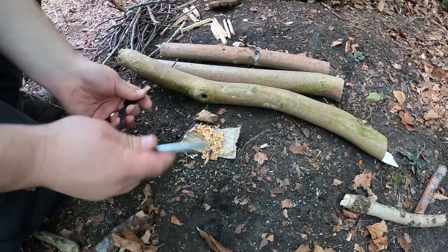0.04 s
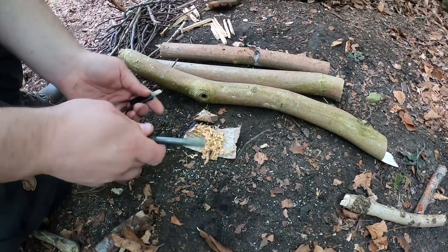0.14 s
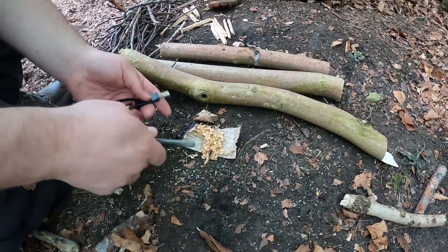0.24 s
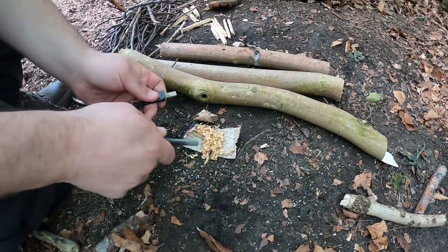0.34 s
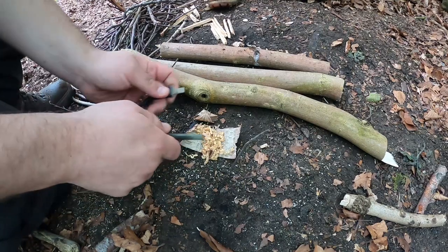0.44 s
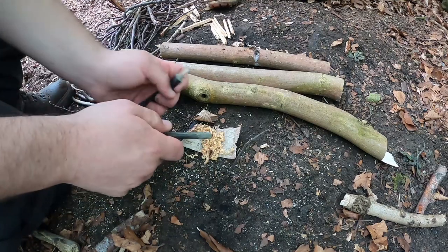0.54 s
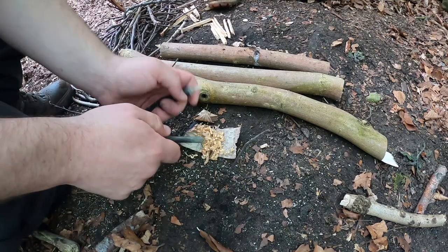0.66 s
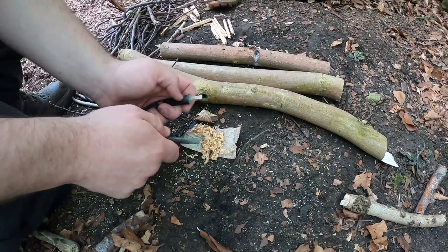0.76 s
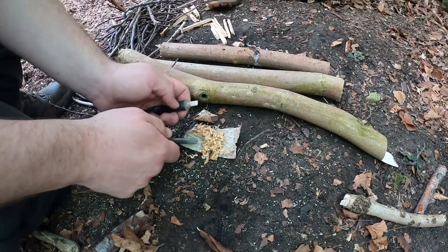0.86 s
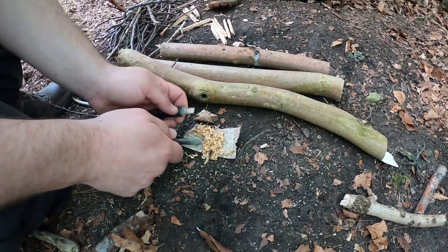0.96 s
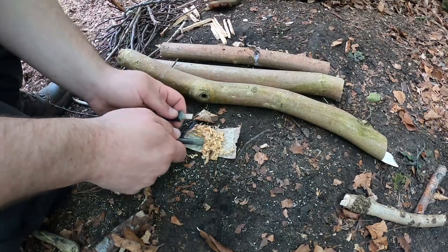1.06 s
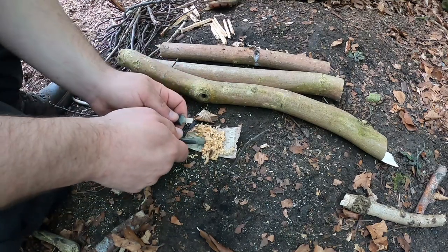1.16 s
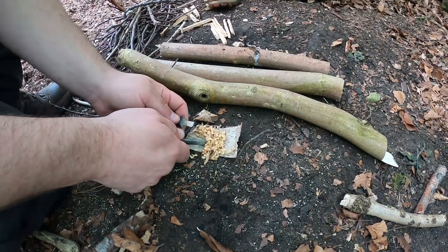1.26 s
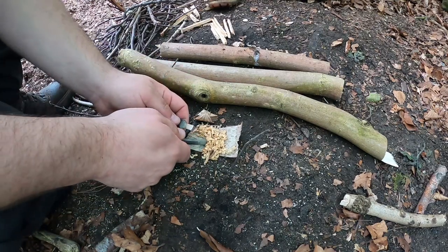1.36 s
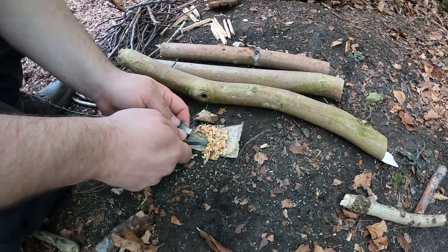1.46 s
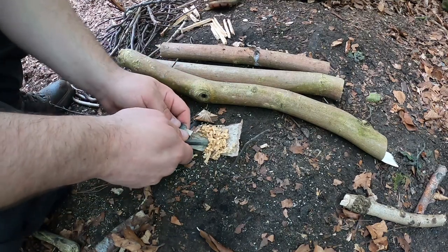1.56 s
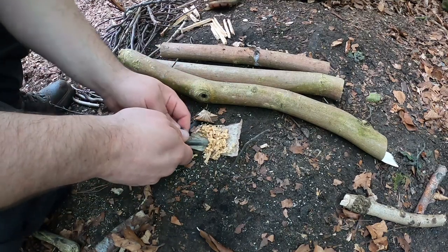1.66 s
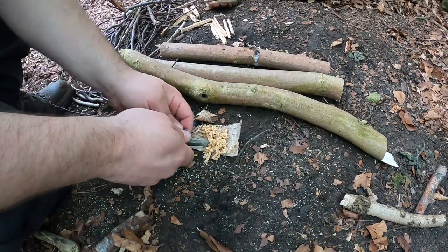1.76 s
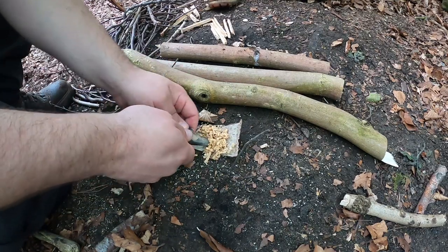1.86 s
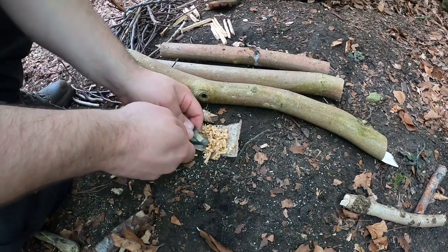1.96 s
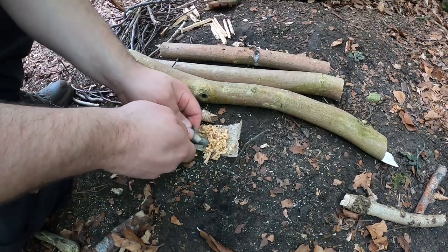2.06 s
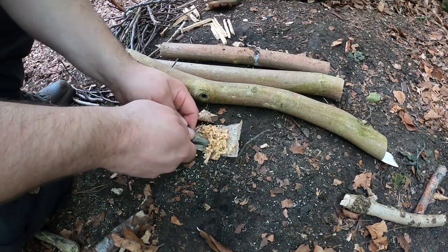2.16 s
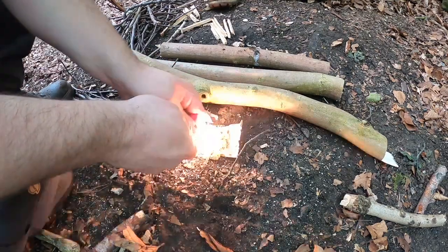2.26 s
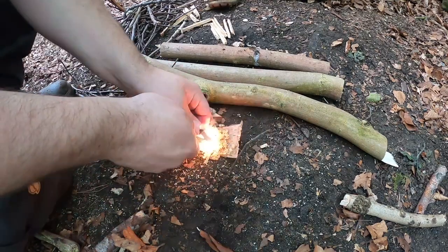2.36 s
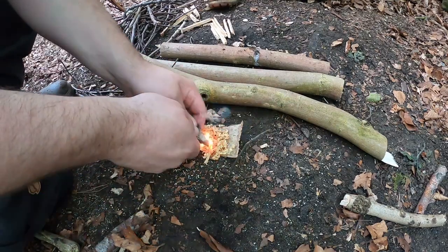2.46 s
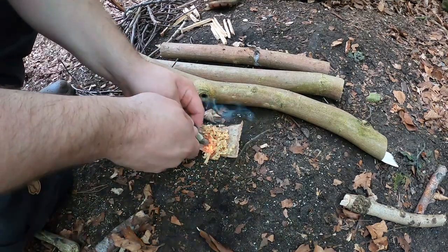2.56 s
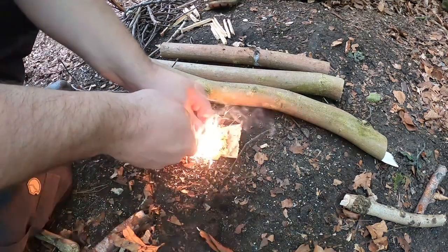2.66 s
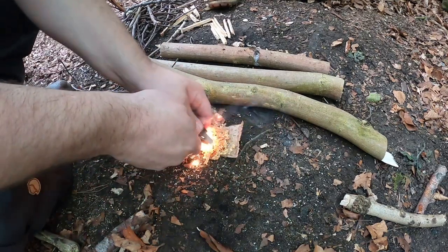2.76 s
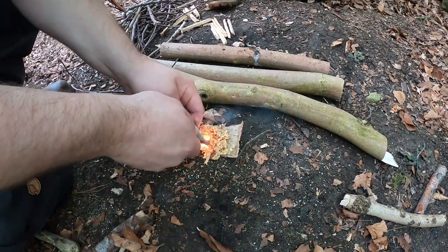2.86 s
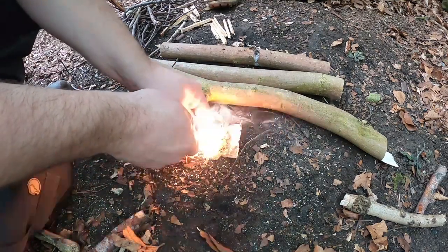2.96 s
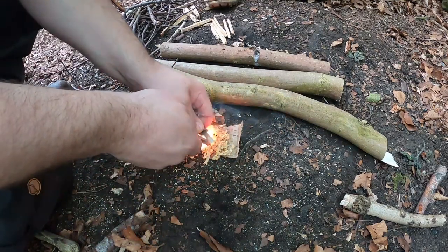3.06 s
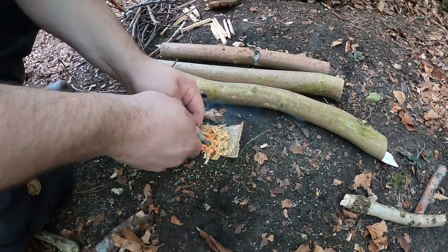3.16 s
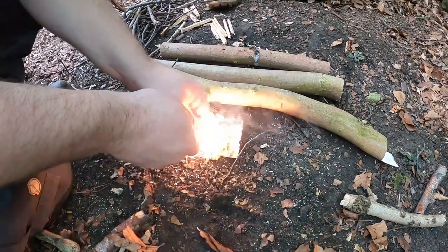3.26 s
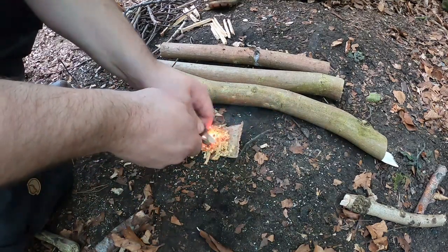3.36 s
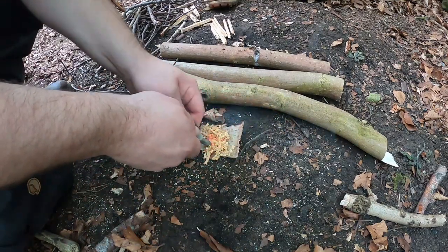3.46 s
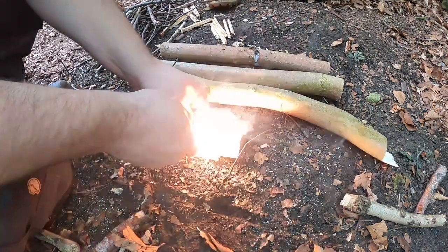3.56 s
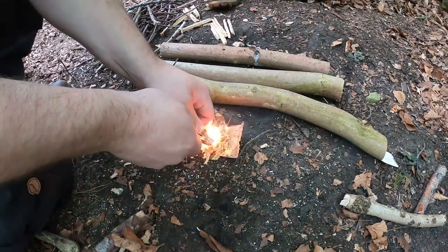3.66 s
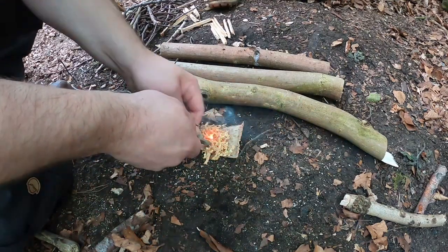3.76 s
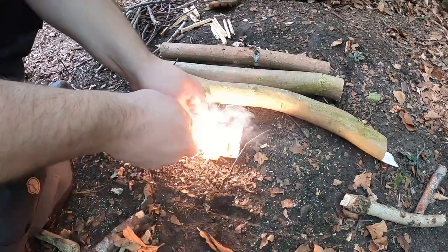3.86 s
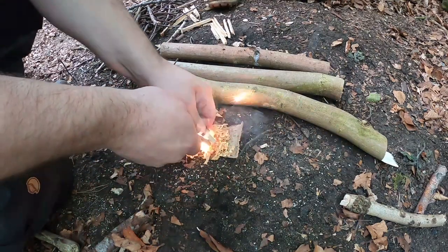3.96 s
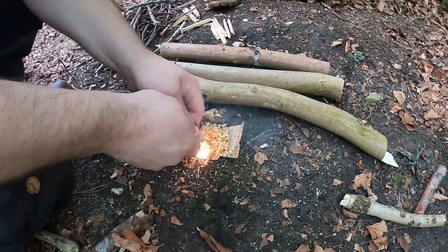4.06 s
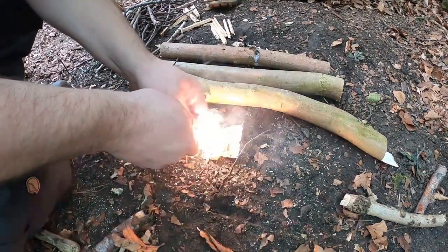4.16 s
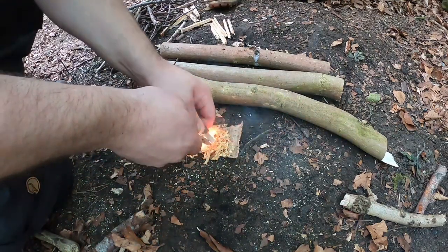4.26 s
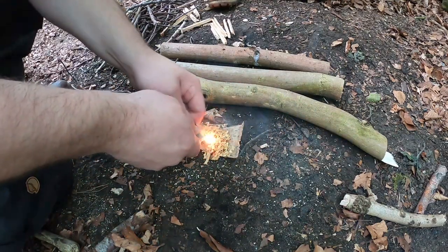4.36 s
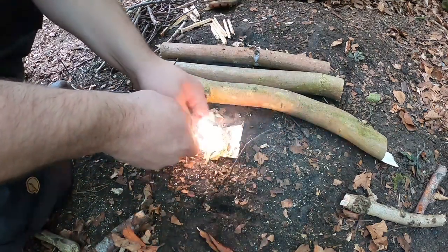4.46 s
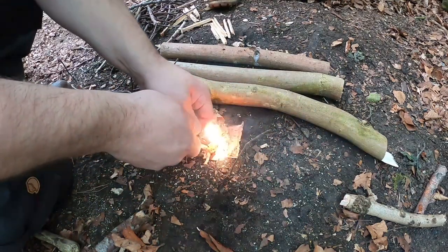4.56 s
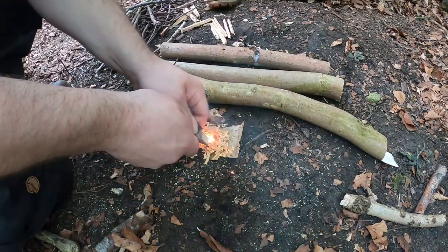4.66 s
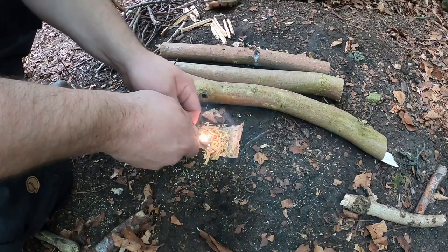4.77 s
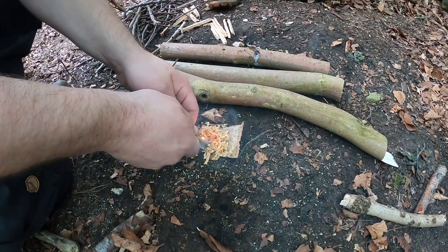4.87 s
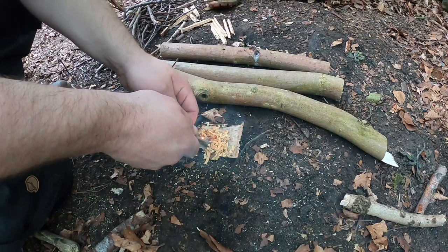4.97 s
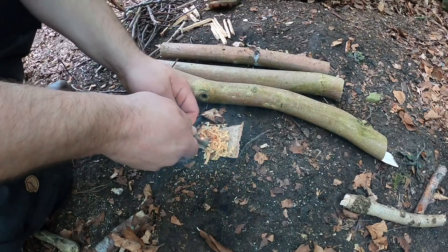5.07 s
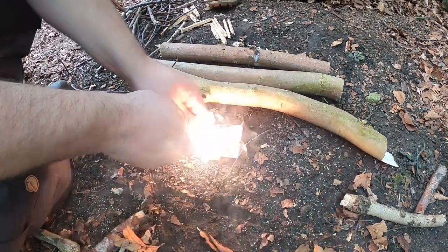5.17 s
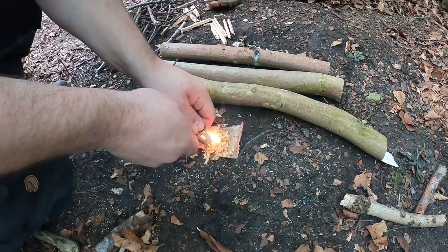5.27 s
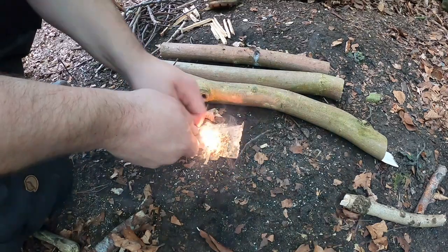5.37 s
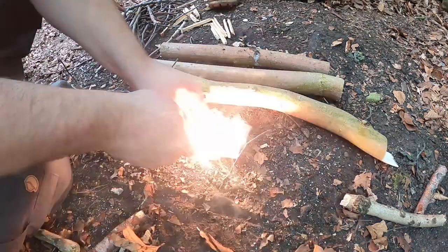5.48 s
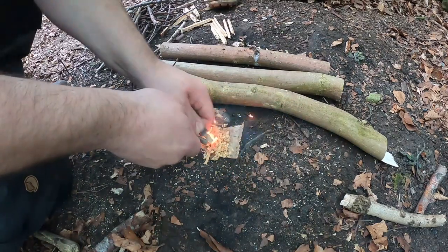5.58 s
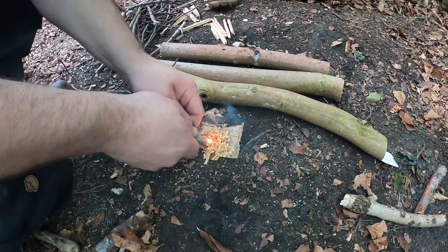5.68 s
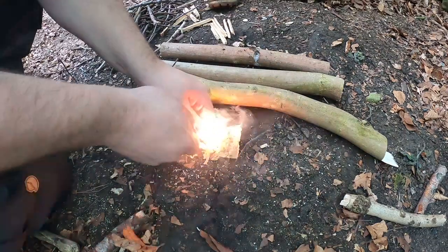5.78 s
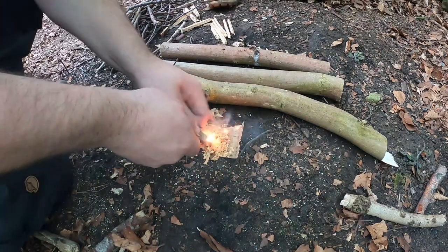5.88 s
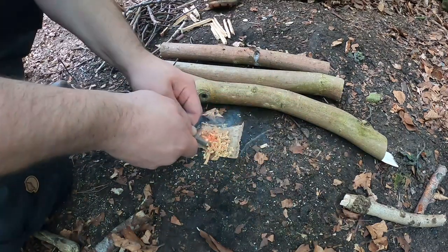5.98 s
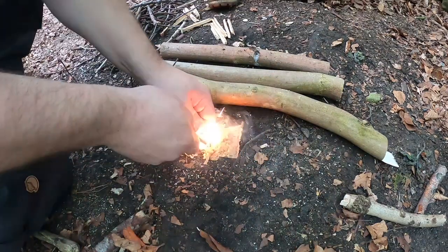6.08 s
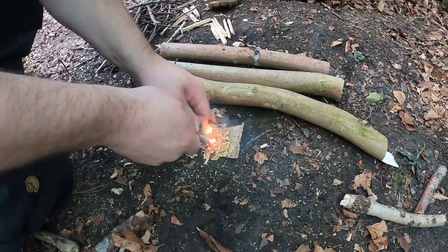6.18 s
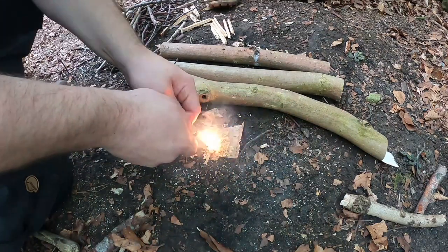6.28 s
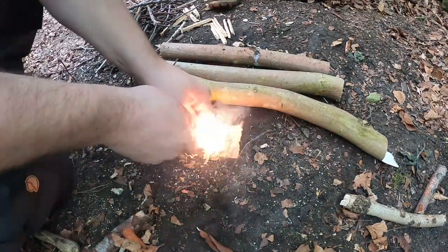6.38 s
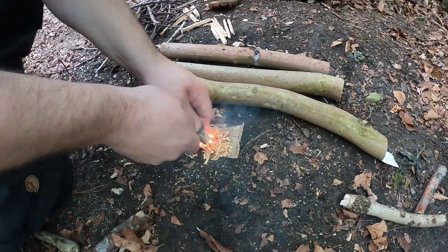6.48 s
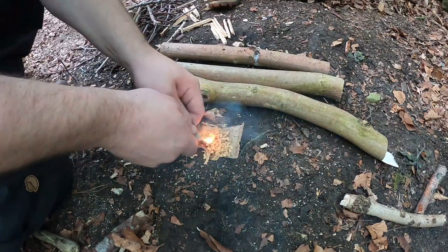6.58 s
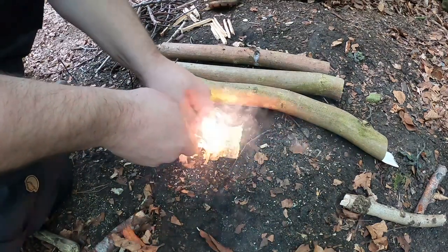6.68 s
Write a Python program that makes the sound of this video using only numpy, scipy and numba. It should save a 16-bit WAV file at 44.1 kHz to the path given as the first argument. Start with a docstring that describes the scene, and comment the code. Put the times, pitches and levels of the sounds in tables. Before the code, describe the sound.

Close up on a forest floor, cloth rustles softly and thin birds whistle while a steel striker is placed with tiny ticks and a sharp snap. Then come thirteen quick, bright, gritty scrapes along a rod, about three a second, each with a crackling burst of sparks and a weaker scrape back. A short pause divides the run. Faint leaves and low wind lie behind; close stereo pickup, almost no echo.

```python
"""Striking sparks from a ferro rod

A steel striker is set on a ferro rod and scraped along it thirteen times, close by, on a forest floor. Each
pass is a stream of tiny random clicks, the fractures of the rod, that rings the steel's resonances. Each hard
stroke throws a crackling shower of sparks (more clicks), and the blade rasps back more lightly. Behind lie
shaped noise for a low rumble, wind, a faint wide hiss and clothes, and gliding tones for far birds."""
import sys
import numpy as np
from scipy import signal
from scipy.fft import rfft, irfft, next_fast_len
from scipy.io import wavfile
from scipy.ndimage import uniform_filter1d, map_coordinates
from numba import njit

SR = 44100
rng = np.random.default_rng(int(sys.argv[2]) if len(sys.argv) > 2 else 0)


def master_out(mix):
    """Clip the mix to full scale and print it as 16-bit PCM to the path in sys.argv[1]."""
    frames = np.transpose(np.atleast_2d(mix))
    ceiling = np.clip(frames, -1, 1)
    pcm = np.round(ceiling * 32767).astype(np.int16)
    wavfile.write(sys.argv[1], SR, pcm)


N = 296793  # length in samples


def undb(db):
    """Decibels to gain."""
    return 10 ** (np.asarray(db) / 20)


def unit(x):
    """Scale to rms 1."""
    return x / np.sqrt(np.mean(x ** 2))


def curve(rows):
    """Join (seconds, value) rows by straight lines."""
    return np.interp(np.arange(N) / SR, *np.transpose(rows))


def add(track, s, sound):
    """Mix a sound into a track from time s."""
    i = int(s * SR)
    track[i:i + len(sound)] += sound[:N - i]


def colour(x, points, share=1):
    """Filter by a spectrum of (Hz, dB) points; share scales every dB value."""
    hz, db = np.transpose(points)
    size = next_fast_len(N + 4096)
    f = np.arange(size // 2 + 1) * SR / size
    gain = undb(share * np.interp(np.log(f + 1), np.log(hz), db))
    return irfft(rfft(x, size) * gain, size)[..., :N]


@njit
def svf(x, hz, damping):
    """State-variable band-pass with a moving centre, gain 1 at the centre."""
    y, b, l = np.empty(len(x)), 0., 0.  # b and l are the two integrator states
    for i in range(len(x)):
        g = np.tan(np.pi * min(hz[i], .45 * SR) / SR)
        v = (b + g * (x[i] + 1e-18 - l)) / (1 + g * (g + damping))
        b, l, y[i] = 2 * v - b, l + 2 * g * v, damping * v
    return y


def band(x, hz, damping):
    """Band-pass on each channel; its width is damping times its centre."""
    return np.apply_along_axis(svf, -1, x, hz * np.ones(x.shape[-1]), float(damping))


def walk(rate):
    """Random levels that slide to a new value every 1 / rate seconds; rms 1."""
    k = max(int(SR / rate), 2)
    held = rng.standard_normal(N)[np.arange(N) // k]
    return unit(uniform_filter1d(held, k))


def air(points, side_db):
    """Stereo noise of a given colour; side_db sets how wide it is."""
    mid, side = colour(rng.standard_normal((2, N)), points)
    return unit(mid + undb(side_db) * np.array([side, -side]))


# Swell of the low outdoor rumble. Each row: time in seconds, level in dB before the gain below.
RUMBLE_SWELL = [(0.0, -67), (1.16, -56), (2.1, -54.5), (2.36, -48), (2.6, -56), (4.8, -50), (5.1, -54.5),
                (5.85, -39), (6.45, -47.5), (6.73, -35.5)]
# Tone of the rumble. Each row: frequency in Hz, relative level in dB.
RUMBLE_COLOUR = [(20, -36), (62, -3.5), (100, -8), (135, -8.5), (175, 5), (215, 5), (270, -9), (350, -21.5),
                 (500, -26), (1000, -50.5)]
RUMBLE_GAIN_DB = 2.2


def rumble():
    """Low noise whose level swells and wavers."""
    level_db = curve(RUMBLE_SWELL) + RUMBLE_GAIN_DB + 2.17 * walk(7.4)
    return air(RUMBLE_COLOUR, side_db=-28.0) * undb(level_db)


WIND_DB, WIND_FOLLOWS = -56, 0.15  # mean level; the wind takes this share of the rumble's swell


def wind():
    """Very low noise in uneven gusts."""
    swell = curve(RUMBLE_SWELL)
    gusts_db = WIND_DB + WIND_FOLLOWS * (swell - swell.mean()) + 3.5 * walk(12)
    return air([(15, -1.5), (60, 5.5), (120, -3.5), (300, -33), (1000, -56)], side_db=-13.5) * undb(gusts_db)


# Tone of the faint background hiss. Each row: frequency in Hz, relative level in dB.
HISS_COLOUR = [(400, -19.5), (900, -6.5), (2400, -7), (3100, -12), (4400, -0.5), (7400, -2), (8500, -42),
               (14000, -52)]


def faint_hiss():
    """A faint, wide, nearly steady hiss."""
    return air(HISS_COLOUR, side_db=-6.5) * undb(-66 + 0.53 * walk(4.94))


# Knees and clothes shift once as the tools are brought into place.
# The row: peak in seconds, level in dB, rise in seconds, fall in seconds.
CLOTHES_SHIFT = (0.72, -58.5, 0.94, 0.18)
# Tone of the cloth. Each row: frequency in Hz, relative level in dB.
CLOTH_COLOUR = [(200, -5.5), (550, 7.5), (1000, -3.5), (2200, -2), (2900, -5), (6000, 3.5), (9000, -11.5),
                (15000, -32)]


def clothes():
    """Cloth rubs on cloth: fluttering noise that rises and falls once."""
    s, db, rise, fall = CLOTHES_SHIFT
    shift = curve([(s - rise, 0), (s, 1), (s + fall, 0)])
    return air(CLOTH_COLOUR, side_db=-23) * shift * undb(db + 2 * walk(40.5))


def scatter(x, decay_s):
    """Diffuse echoes, different on each side: decaying noise used as the echo pattern."""
    t = np.arange(int(7 * decay_s * SR)) / SR
    echo = unit(rng.standard_normal((2, len(t))) * np.exp(-t / decay_s)) / np.sqrt(len(t))
    return signal.fftconvolve(np.atleast_2d(x), echo, axes=1)[:, :N]


WARBLE_HZ = 45.2


def whistle(length, start_hz, end_hz, warble):
    """One gliding, warbling note; warble is a share of the pitch."""
    u = np.linspace(0, 1, int(length * SR))
    glide = start_hz + (end_hz - start_hz) * u
    hz = glide * (1 + warble * np.sin(2 * np.pi * WARBLE_HZ * length * u))
    loudness = np.sqrt(2 * np.abs(np.sin(np.pi * u)))
    return loudness * np.sin(2 * np.pi * np.cumsum(hz) / SR)


# Thin falling whistles. Each row: start in seconds, starting pitch in Hz, level in dB before the mix.
WHISTLES = [(0, 3780, -69), (.09, 6970, -64), (.24, 4670, -62.5), (.675, 4160, -64.5), (.76, 2920, -75),
            (1.0, 2410, -75), (1.62, 2330, -67), (1.655, 1864, -62), (5.07, 7320, -62), (5.16, 5050, -67)]
WHISTLE_S, WHISTLE_FALL, WHISTLE_WARBLE = .11, 0.0298, .006  # length; fall and warble as shares of the pitch
# One bird's long descending trill. The row: start in seconds, length in seconds, starting pitch in Hz,
# ending pitch in Hz, warble as a share of the pitch, level in dB before the mix.
TRILL = (0.2, 0.9, 5900, 4899.5, -0.32, -65.5)
# farther birds heard only as echoes: calls a second, range of starting pitch, level before the mix
CHORUS_PER_S, CHORUS_HZ, CHORUS_DB = 9, (3400, 7300), -71


def birds():
    """Whistles, a trill and a farther chorus, smeared by the trees."""
    song, chorus = np.zeros((2, N))
    for s, hz, db in WHISTLES:
        add(song, s, undb(db) * whistle(WHISTLE_S, hz, hz * (1 - WHISTLE_FALL), WHISTLE_WARBLE))
    s, *shape, db = TRILL
    add(song, s, undb(db) * whistle(*shape))
    for when, pitch in rng.random((int(CHORUS_PER_S * N / SR), 2)):
        hz = np.interp(pitch, [0, 1], CHORUS_HZ)
        call = whistle(WHISTLE_S, hz, hz * (1 - WHISTLE_FALL), warble=.04)
        add(chorus, when * N / SR, undb(CHORUS_DB) * call)
    return undb(-1) * song + undb(3.5) * scatter(song + chorus, decay_s=0.18)


def forest(x):
    """Ground and hands scatter the treble at once; the trunks return a very faint tail."""
    trunks = undb(-38) * scatter(x, decay_s=.1)
    near = colour(scatter(x, decay_s=0.0018), [(700, -20), (2500, -8.5), (10000, -6)])
    return x + near + trunks


def contacts(rows, decay_s, damping):
    """Short contacts: a first impulse and a brief decaying rattle, both band-passed twice."""
    out, t = np.zeros(N), np.arange(SR // 25) / SR
    for s, db, hz in rows:
        push = (t == 0) + 0.29 * rng.standard_normal(len(t)) * np.exp(-t / decay_s)
        hit = band(band(push, hz, damping), hz, damping)
        add(out, s, undb(db) * hit / np.abs(hit).max())
    return out


# Dull taps of the hands on the ground and tinder.
# Each row: start in seconds, peak level in dB, centre frequency in Hz.
TAPS = [(.112, -42, 870), (4.465, -32, 940), (4.82, -39, 1100), (5.015, -45.5, 600)]


def hand_taps():
    """Soft contacts, lower and longer than the steel's."""
    return contacts(TAPS, decay_s=0.0029, damping=0.75)


# The steel knocks or catches on the rod.
# Each row: start in seconds, peak level in dB before the steel rings, centre frequency in Hz.
CLICKS = [(.536, -23, 5000), (1.419, -35, 3000), (1.934, -28.5, 3270), (2.0, -29, 3500), (2.032, -25, 3300),
          (2.138, -26.5, 3400), (2.27, -24, 3300), (2.9255, -8.5, 3500), (3.061, -23.5, 5200),
          (3.241, -18, 4200), (3.382, -19.5, 5100), (3.665, -16, 5100), (3.867, -12, 3300),
          (4.166, -19, 4500), (4.619, -16, 5440), (5.211, -45, 3000), (5.529, -17, 3100),
          (5.583, -16, 4700), (5.614, -21, 4000), (5.7595, -12.5, 3900), (6.689, -22, 2900)]


def steel_clicks():
    """Sharp contacts of about a millisecond that set the steel ringing."""
    return contacts(CLICKS, decay_s=0.001, damping=1.13)


# The striker's edge snaps down onto the rod. The row: start in seconds, level in dB.
SNAP = (1.7947, -17.5)
# What the snap rings with. Each row: pitch in Hz, relative level in dB, time to fall by 60 dB in seconds.
SNAP_MODES = [(2170, -1, 0.016), (2700, 4.5, 0.0027), (3500, -4.5, 0.0087), (4500, 2, 0.0051),
              (5100, -2, 0.012), (6910, 5.5, 0.0065)]


def snap():
    """One clean steel click, a few tones choked at once by the fingers."""
    out, t = np.zeros(N), np.arange(SR // 25) / SR
    s, level_db = SNAP
    ring = 0
    for k, (hz, db, t60) in enumerate(SNAP_MODES):
        ring = ring + (-1) ** k * undb(db - 60 * t / t60) * np.sin(2 * np.pi * hz * t)
    onset = 1 - np.exp(-(t / 0.00033) ** 2)
    add(out, s, undb(level_db) * ring * onset)
    return out


# Side against middle, for chips that fly all round. Each row: frequency in Hz, side level in dB.
SPREAD = [(900, -20), (2000, -27), (3500, -10), (8000, -16), (12000, -8.5)]


def grains(rate, spread_db, chatter_hz, chatter_db):
    """Dense micro-clicks of uneven size that come in quick bunches, each leaning randomly left or right."""
    size = undb(spread_db * np.minimum(rng.exponential(size=N), 3))
    chatter = 2 * np.tanh(unit(band(rng.standard_normal(N), chatter_hz, 0.81)) / 2)
    clicks = (rng.random(N) < rate / SR) * size * undb(chatter_db * chatter)
    mid, side = clicks * rng.choice([-1, 1], (2, N))
    side = colour(side, SPREAD)
    return unit(np.array([mid + side, mid - side]))


def crack():
    """A large spark bursts: one sharp pulse and about a millisecond of spitting."""
    t = np.arange(SR // 100) / SR
    return 0.24 * rng.standard_normal(len(t)) * np.exp(-t / 0.0013) - (t == 0)


def across_strokes(first, last):
    """One value for each stroke, moving evenly from the first stroke to the last."""
    return np.linspace(first, last, len(STROKES))


# Single large sparks burst. Each row: start in seconds, level in dB before gain and colour.
POPS = [(2.525, -19), (2.84, -14.5), (3.198, -23.5), (3.739, -33), (3.821, -21), (4.086, -17.5),
        (5.381, -7), (6.234, -16.5)]
# Colour of a bursting spark. Each row: frequency in Hz, relative level in dB.
SPARK_COLOUR = [(50, -0.5), (150, 5), (400, 1.5), (520, -1.5), (700, 3.5), (830, -2), (1100, 2), (2700, -2),
                (5000, 0.5), (7500, -13), (9000, -15), (11000, -22), (13000, -23), (15500, -35)]
# the sparks die sooner as the strokes grow snappier: seconds to fall by 20 dB, first and last stroke
EMBER_DECAY_S = (0.3, .16)


def sparks():
    """Chips ignite in a dense burst; stragglers crackle on and burn out; a few large ones pop."""
    t = np.arange(N) / SR
    flare, embers, pops = np.zeros((3, N))
    life_s = 0.21
    for (s, *_, delay, db), decay in zip(STROKES, across_strokes(*EMBER_DECAY_S)):
        age = t - s - delay
        near = np.abs(age) < .5
        before, after = np.minimum(age[near], 0), np.maximum(age[near], 0)
        ignition = np.exp(-(before / 0.035) ** 2)
        flare[near] += undb(db) * ignition * np.exp(-(after / 0.027) ** 2)
        burn_out = undb(-20 * after / decay) * np.exp(-(after / life_s) ** 6)
        embers[near] += undb(db - 8.0) * ignition * burn_out
    for s, db in POPS:
        add(pops, s, undb(db + 11) * crack())
    burst = flare * grains(rate=8000, spread_db=2.0, chatter_hz=350.0, chatter_db=5.0)
    crackle = embers * grains(rate=4000, spread_db=4, chatter_hz=200, chatter_db=4)
    crackle = colour(crackle, [(100, -0.5), (1500, 3.0), (5000, 3.5), (8000, 3.0), (14000, 7.5)])
    shower = colour(undb(7) * (burst + crackle), SPARK_COLOUR)
    return shower + colour(pops, SPARK_COLOUR, share=0.73)


# Resonances of striker and rod, damped by the fingers. Each row: pitch in Hz, width in Hz, level in dB,
# dB gained at the top of the rod (and lost at the bottom).
STEEL = [(2204, 740, -4.5, 4), (2650, 270, -2.5, 3), (3500, 1740, -3, -1), (5000, 940, -3.5, 0),
         (6950, 360, -1, 4.5), (9400, 940, -15, -7)]


def steel(x):
    """Striker and rod ring higher at the top, in another balance, and sink as the blade runs down."""
    lead_s, lag_s, swing_octaves = .035, .07, .04
    # place on the rod: 1 at the top, -1 at the bottom
    place = curve([point for s, *_ in STROKES for point in ((s - lead_s, 1), (s + lag_s, -1))])
    tuning = 2 ** (swing_octaves * place + 0.07 * walk(35))
    return sum(undb(db + top_db * place) * band(x, hz * tuning, width / hz) for hz, width, db, top_db in STEEL)


def scrape(teeth, s, db, rise, fall, hz, glide, damping):
    """One pass of the blade: it lands abruptly, and its hiss brightens with speed and slides along the rod."""
    a, b = max(int((s - 2 * rise) * SR), 0), min(int((s + 2 * fall) * SR), N)
    t = np.arange(a, b) / SR - s
    travel = np.where(t < 0, t / rise, t / fall)  # -1: the blade lands; 1: it is nearly at rest
    contact = (1 + np.tanh((t + rise) / 0.0094)) / 2
    speed = contact * undb(np.where(t < 0, -15, -20) * np.abs(travel) ** 2.04)
    centre = hz * (0.77 + 0.26 * speed) * 2 ** (glide * np.tanh(travel))
    hiss = band(band(teeth[:, a:b], centre, damping), centre, damping)
    out = np.zeros((2, N))
    out[:, a:b] = undb(db) * speed * unit(hiss)
    return out


# All levels here are in dB before the blade's mix and the ringing steel.
# Hard strokes. Each row: fastest travel in seconds, scrape level in dB, rise in seconds, fall in seconds,
# spark delay in seconds, sparks level in dB before gain and colour.
STROKES = [(2.421, -27, 0.068, 0.14, 0.026, -32.5), (2.802, -24.5, 0.071, 0.086, .016, -28),
           (3.107, -25, .044, .11, 0.021, -32.5), (3.428, -25.5, 0.057, 0.077, 0.011, -31.5),
           (3.73, -24.5, .05, 0.091, 0.0097, -30.5), (4.055, -24.5, 0.066, 0.075, 0.0036, -30.5),
           (4.354, -25.5, .057, 0.059, 0.0066, -31.5), (4.642, -25.5, 0.051, .08, 0.015, -32.5),
           (5.342, -24.5, 0.06, 0.062, 0.011, -31), (5.655, -25, 0.056, 0.061, 0.0065, -30),
           (5.924, -26.5, 0.061, .062, .012, -30.5), (6.21, -23.2, 0.042, 0.058, 0.012, -30),
           (6.53, -27, 0.061, 0.086, 0.007, -31)]
# The blade is drawn back up the rod. Each row: fastest travel in seconds, level in dB, half length in seconds.
RETURNS = [(2.636, -33, 0.054), (2.966, -28, 0.057), (3.271, -29.5, .05), (3.578, -30.5, 0.053),
           (3.895, -29, 0.041), (4.185, -34, .064), (4.497, -35, 0.063), (4.742, -38.5, 0.035),
           (5.516, -32, 0.052), (5.781, -33, 0.041), (6.04, -38, .06), (6.372, -35.5, 0.07),
           (6.675, -35.5, 0.052)]
# Light rubs as the blade is seated or slides off. Each row: fastest travel in seconds, level in dB,
# half length in seconds, nominal hiss centre in Hz.
RUBS = [(0.259, -56, 0.027, 5200), (1.374, -58, 0.096, 4800), (1.449, -49.5, 0.021, 3800),
        (1.623, -51.5, .12, 4200), (1.975, -41.5, .03, 3400), (2.06, -37, .062, 3700),
        (2.242, -29.5, .041, 2950), (2.27, -53, 0.15, 3400), (2.39, -33, .03, 3700),
        (4.87, -45, 0.11, 4200), (4.96, -41, .05, 7500)]
# after each stroke the blade drags on as the pressure eases: delay, dB against the stroke's own level
# (first stroke, last stroke), half length
DRAG_DELAY_S, DRAG_DB, DRAG_S = 0.074, (-13, -21), 0.044
STROKE_HZ, RETURN_HZ, DRAG_HZ = 5300, 4500, 3600  # nominal hiss centre, moved by speed and glide
GRIT_PER_S, GRIT_DB = 38, -8.5  # grit caught under the edge while it is seated


def blade():
    """The edge tears fine chips off the rod going down and chatters over the grooves coming back."""
    ridges = undb(2.63 * walk(80))  # worn grooves make the edge catch unevenly
    bite = ridges * grains(rate=12000, spread_db=2.0, chatter_hz=397, chatter_db=5.5)
    skim = ridges * grains(rate=8000, spread_db=3.5, chatter_hz=305, chatter_db=3.5)
    # while it is being seated the slow blade sticks and slips in separate ticks
    grit = unit((rng.random(N) < GRIT_PER_S / SR) * rng.uniform(0.39, 1, N))
    slips = unit(skim * undb(3.2 * np.tanh(walk(170)))) + undb(GRIT_DB) * grit

    down = sum(scrape(bite, s, db, rise, fall, STROKE_HZ, glide=-0.18, damping=1.1)
               for s, db, rise, fall, *_ in STROKES)
    light = [(skim, s + DRAG_DELAY_S, db + drag_db, DRAG_S, DRAG_S, DRAG_HZ)
             for (s, db, *_), drag_db in zip(STROKES, across_strokes(*DRAG_DB))]
    light += [(skim, s, db, half, half, RETURN_HZ) for s, db, half in RETURNS]
    back = sum(scrape(*row, glide=0.032, damping=1.2) for row in light)
    rubs = sum(scrape(slips, s, db, half, half, hz, glide=.04, damping=1.05) for s, db, half, hz in RUBS)

    # lightly pressed, the striker rings more freely in its two main resonances
    drift = 2 ** (0.13 * walk(13))
    free = band(back, 4950 * drift, 0.22) + undb(-5.3) * band(back, 2720 * drift, 0.18)
    return undb(-2.5) * down + undb(-2.0) * (back + free) + undb(.5) * rubs


def scene():
    """Tools and sparks just in front, the outdoors around them."""
    background = rumble() + wind() + faint_hiss() + clothes()
    metal = steel(blade() + undb(1) * steel_clicks())
    front = metal + snap() + sparks() + hand_taps()
    return background + birds() + forest(front)


# Tone of the two pickup ports, applied strongly on the left and weakly on the right.
# Each row: frequency in Hz, level in dB before each side's share.
PORTS = [(200, 0), (1000, -1.5), (2700, 2), (4500, -3), (6200, -2.5), (6900, -6), (8300, -3), (13000, -4)]
TOP_HZ = 15800  # little passes above this


def record(dry):
    """Two close ports: the left hears slightly later, the right has a low cavity ring; the top is cut."""
    left, right = colour(dry[0], PORTS, share=0.86), colour(dry[1], PORTS, share=0.21)
    lag_samples = 0.88
    left = map_coordinates(left, [np.arange(N) - lag_samples], order=3)
    right = right + undb(12.5) * band(right, 311.2, 0.046)
    top_cut = signal.ellip(10, .2, 70, TOP_HZ, fs=SR, output="sos")
    return signal.sosfilt(top_cut, np.array([left, right]))


dry = scene()
out = record(dry)
master_out(out)
```